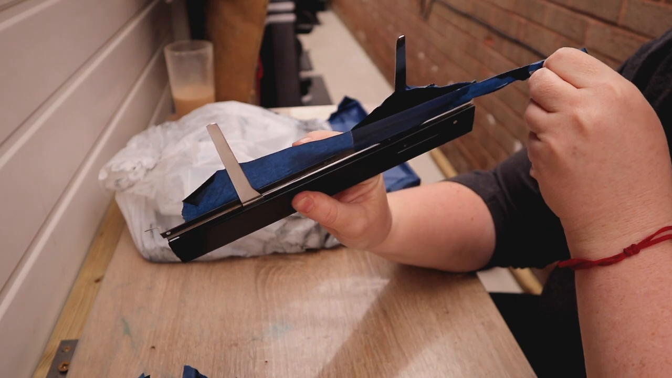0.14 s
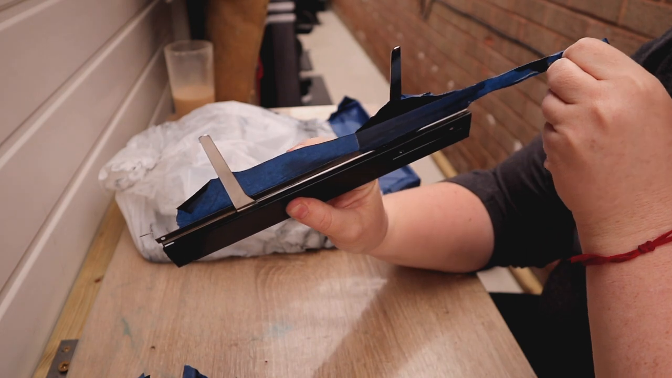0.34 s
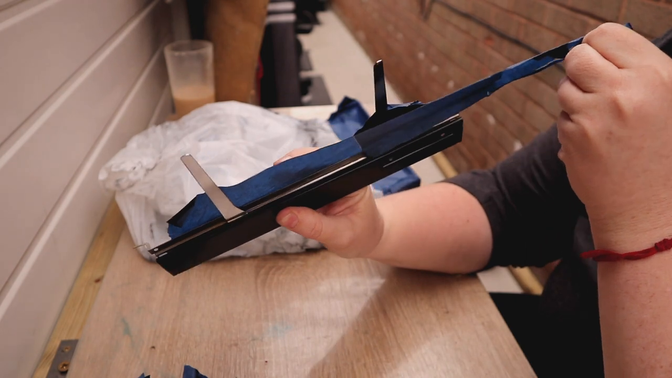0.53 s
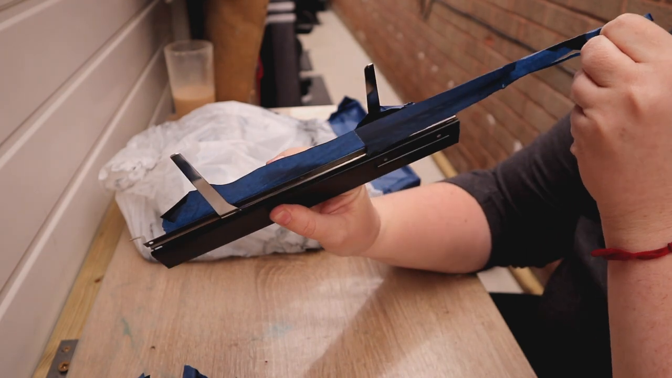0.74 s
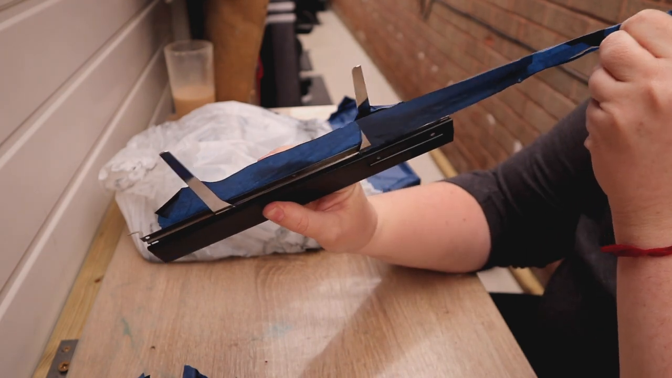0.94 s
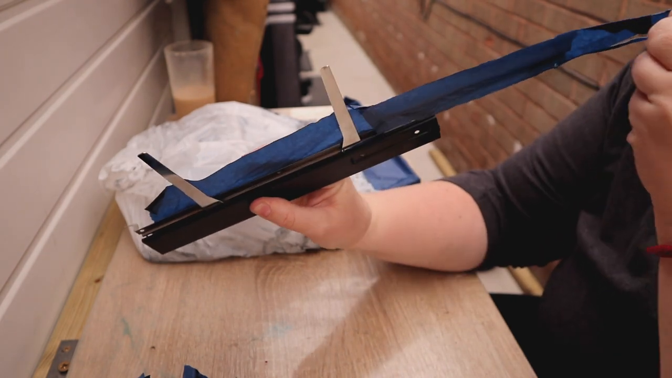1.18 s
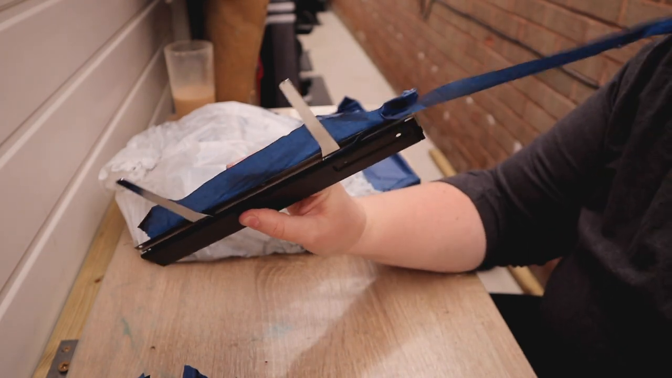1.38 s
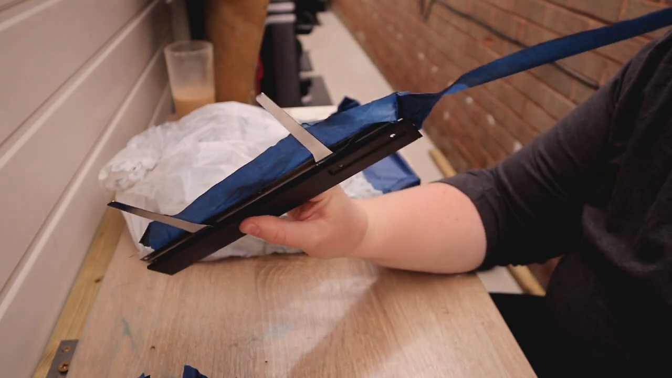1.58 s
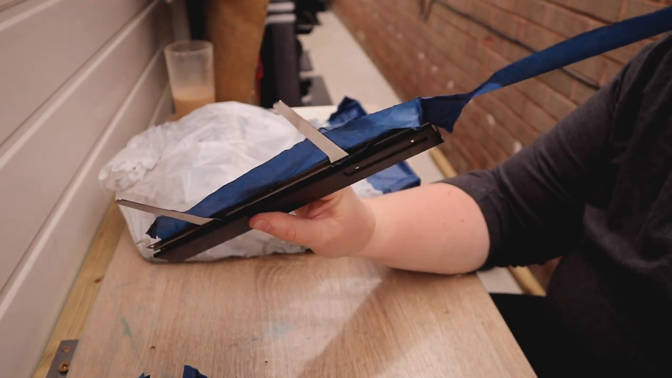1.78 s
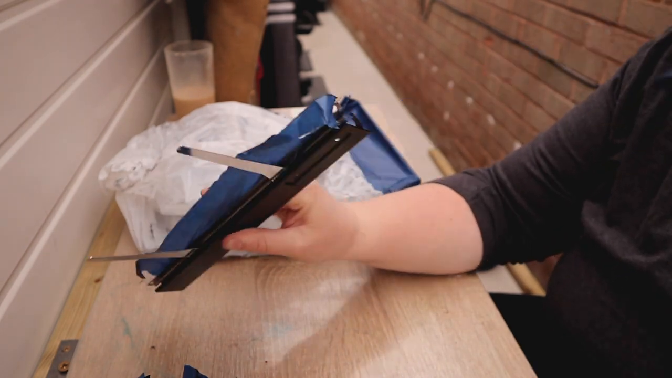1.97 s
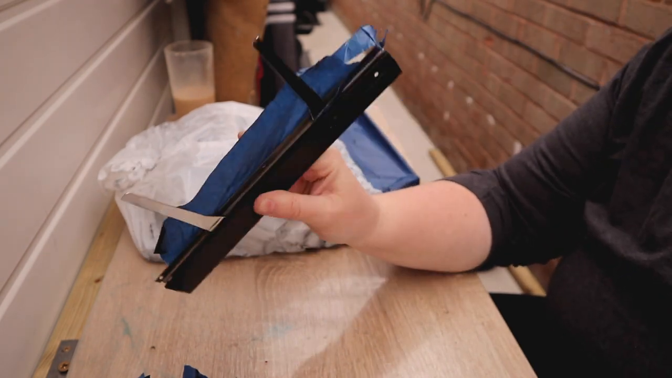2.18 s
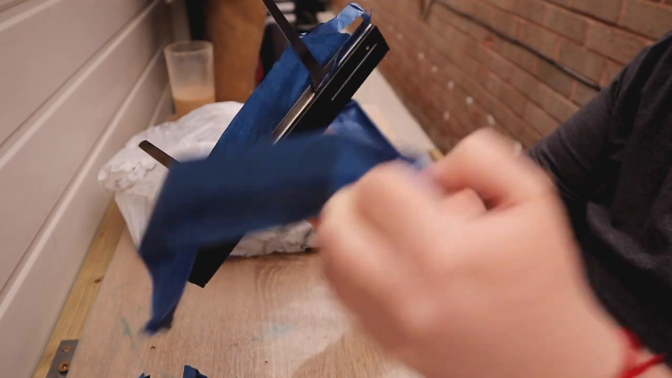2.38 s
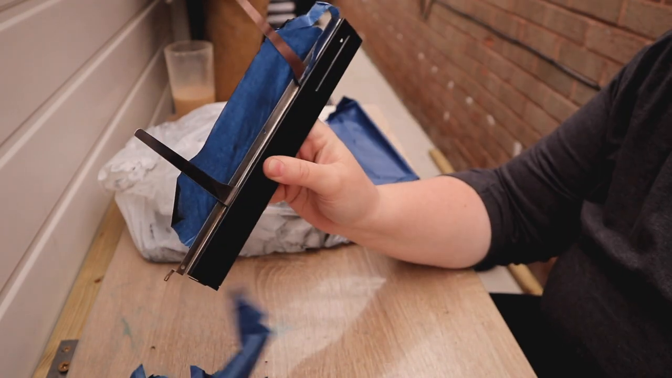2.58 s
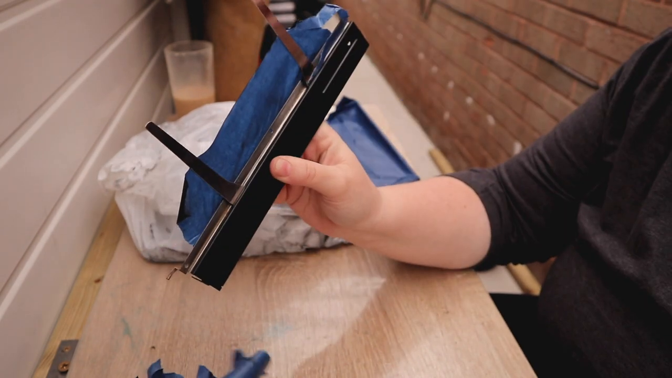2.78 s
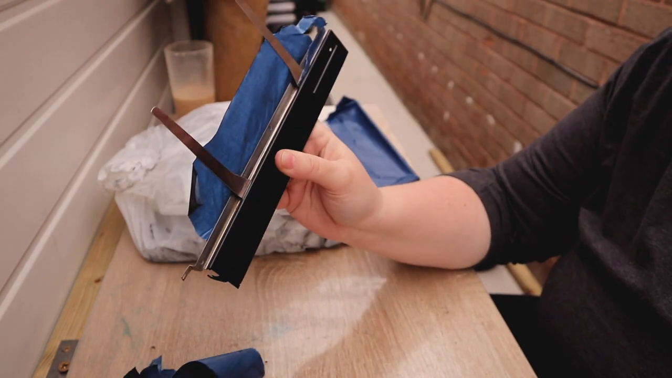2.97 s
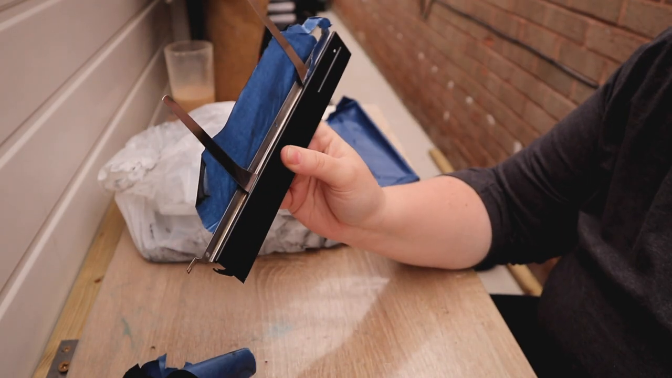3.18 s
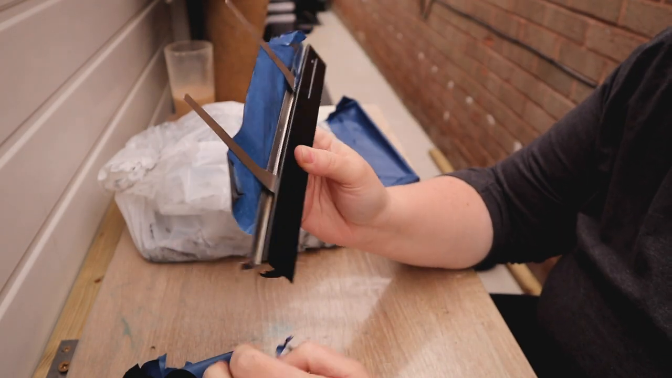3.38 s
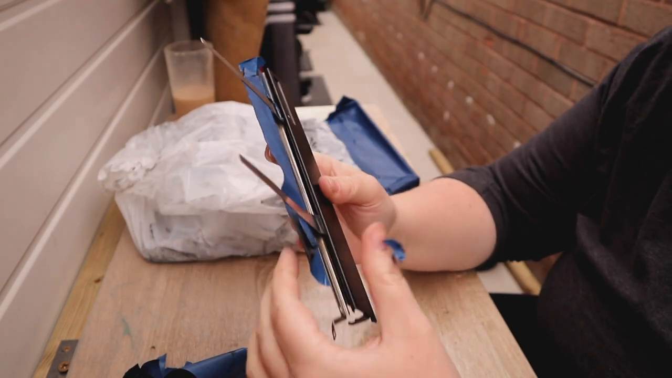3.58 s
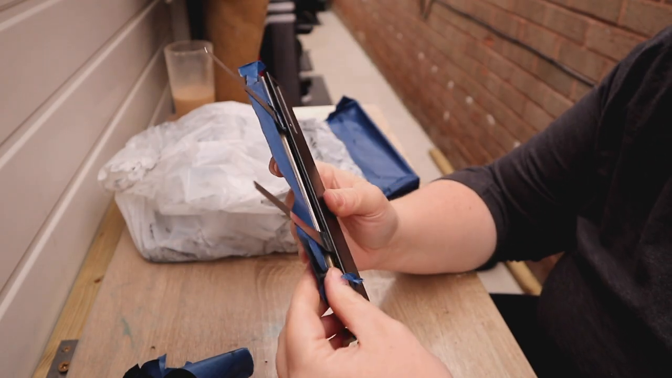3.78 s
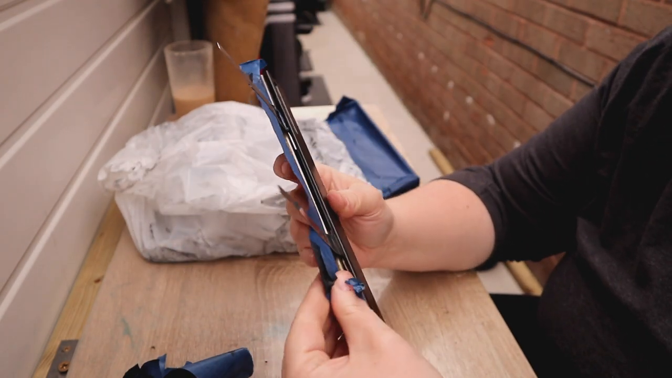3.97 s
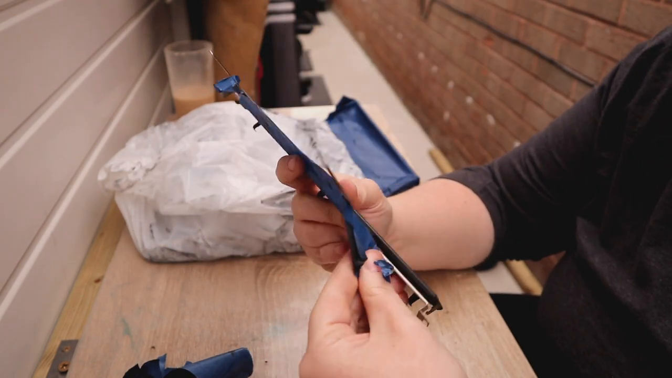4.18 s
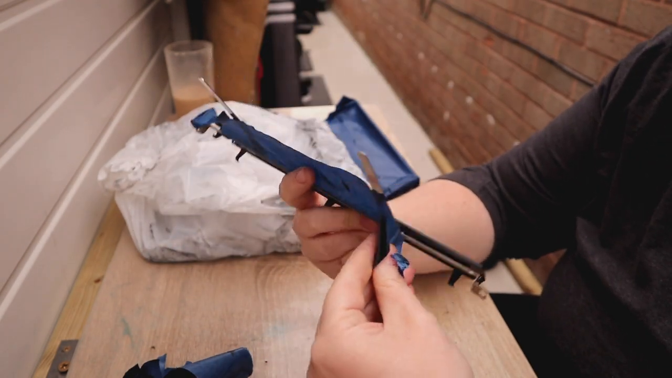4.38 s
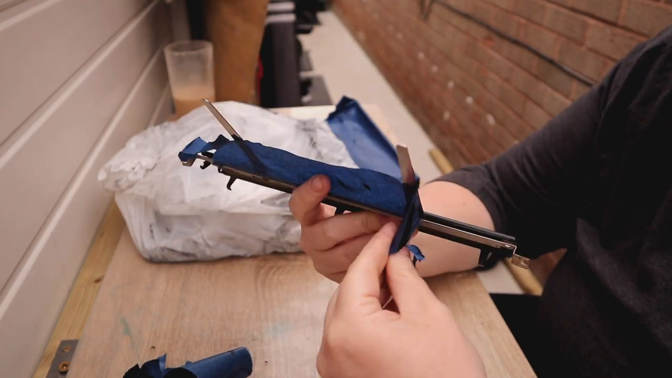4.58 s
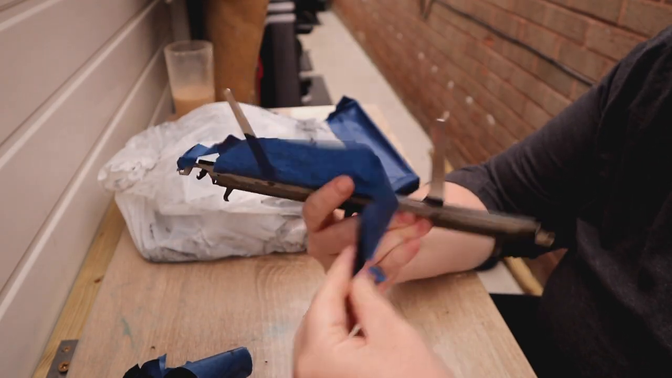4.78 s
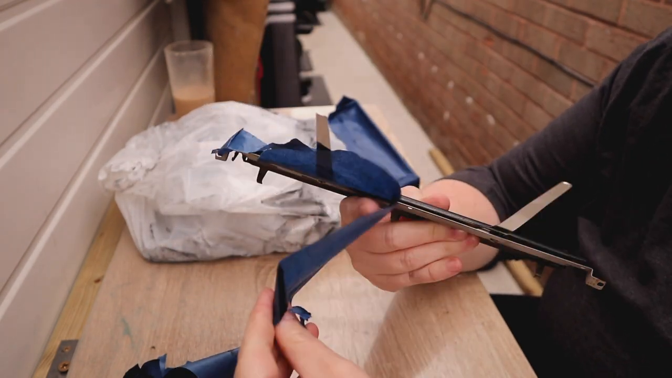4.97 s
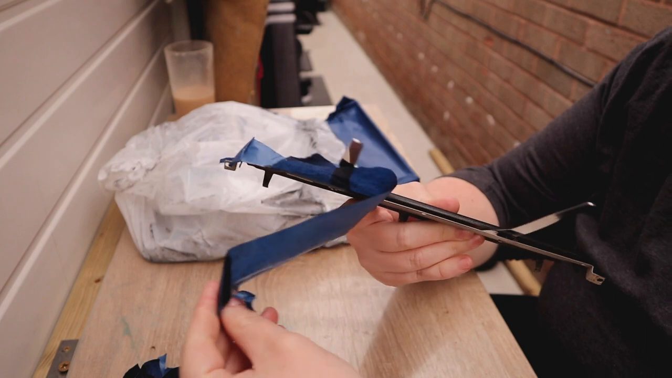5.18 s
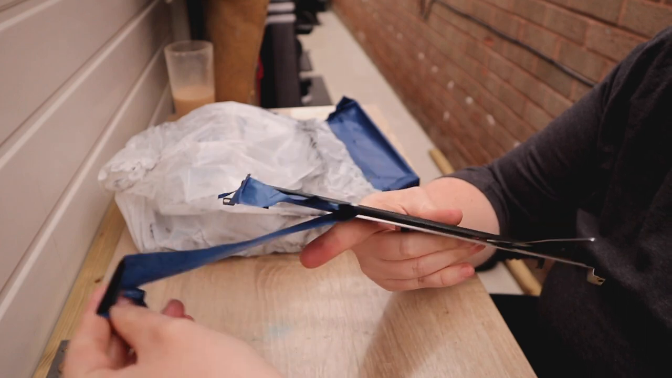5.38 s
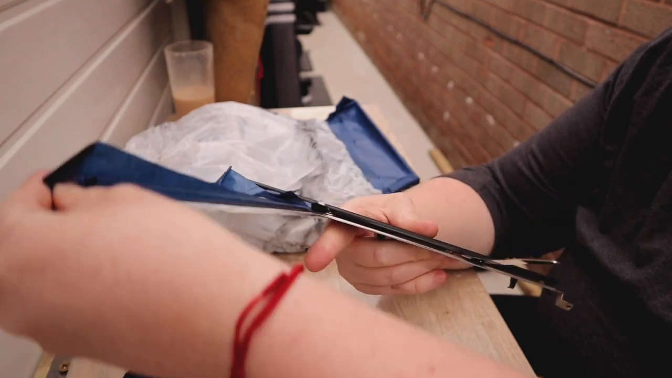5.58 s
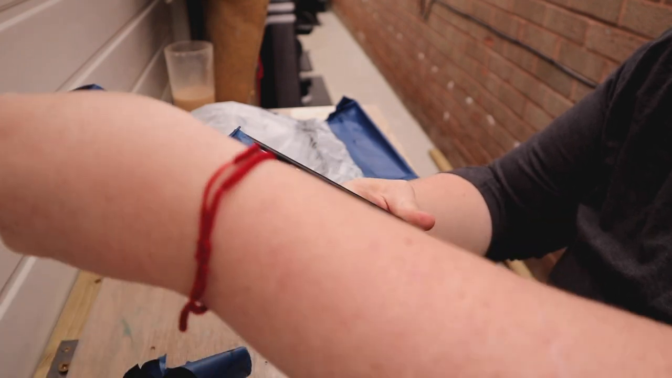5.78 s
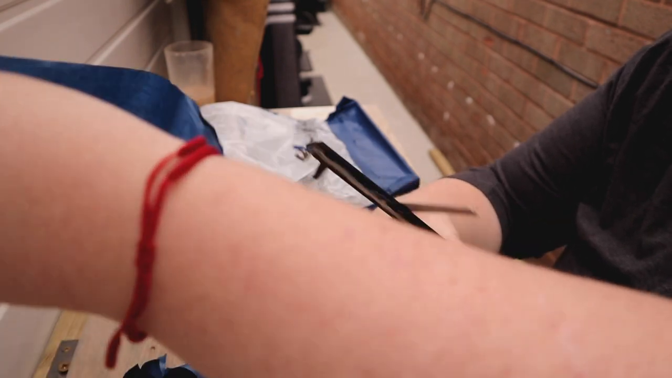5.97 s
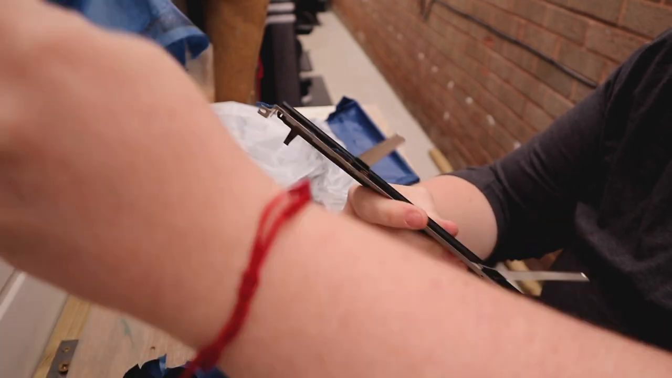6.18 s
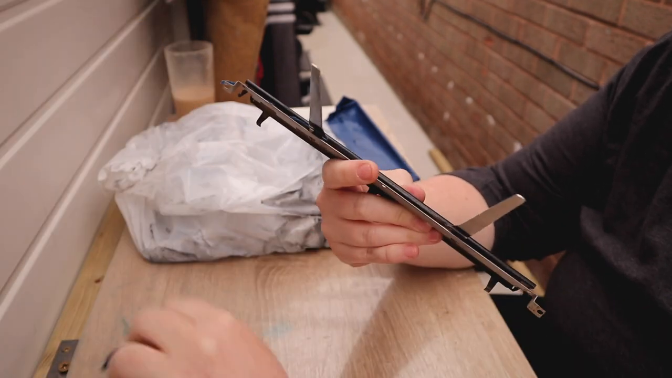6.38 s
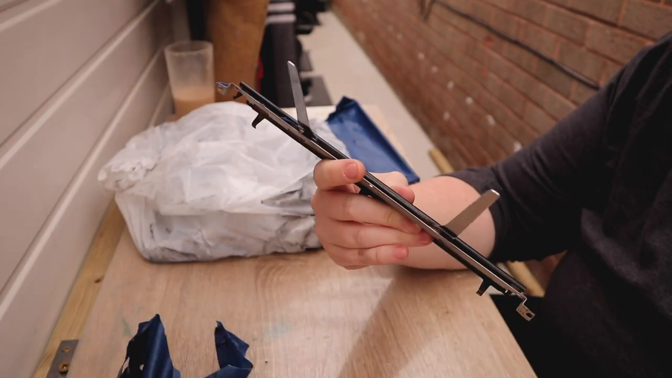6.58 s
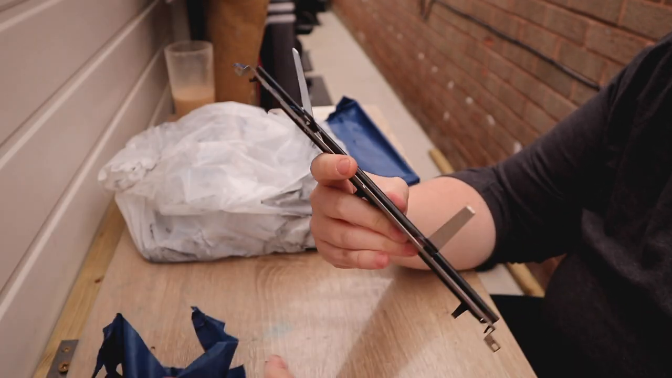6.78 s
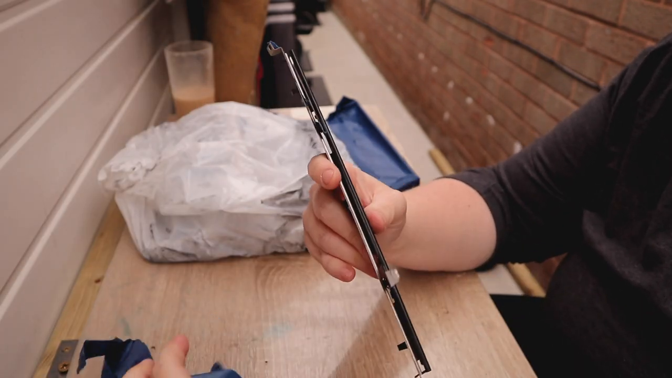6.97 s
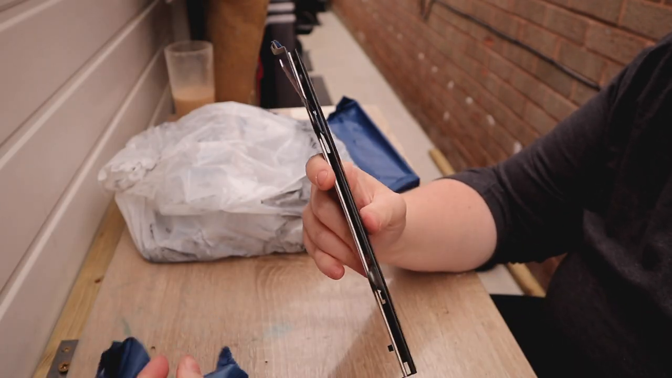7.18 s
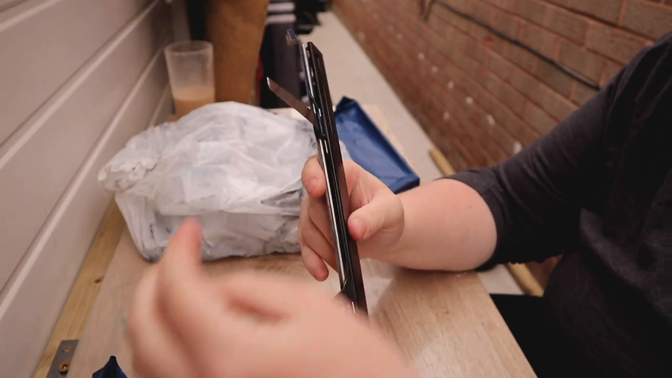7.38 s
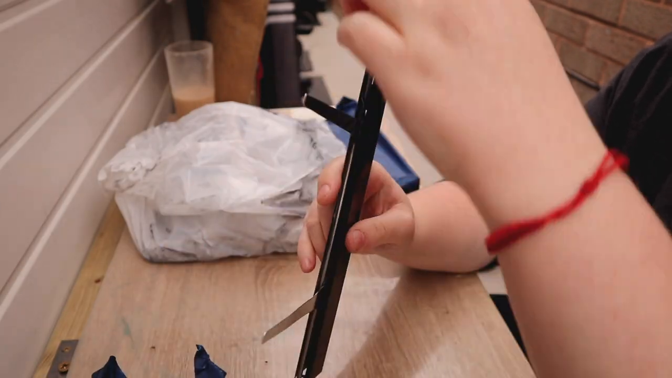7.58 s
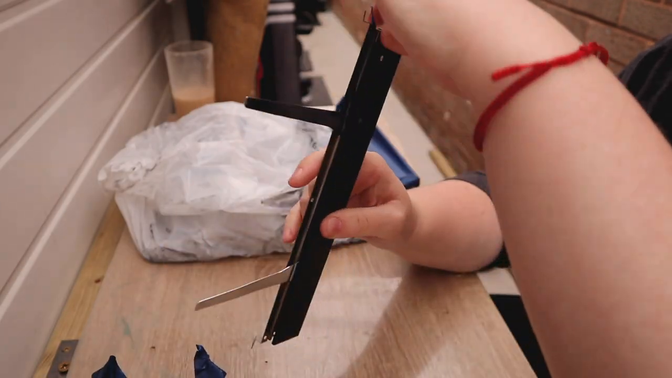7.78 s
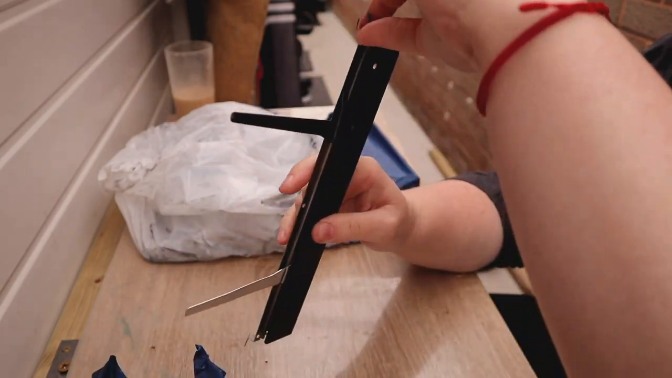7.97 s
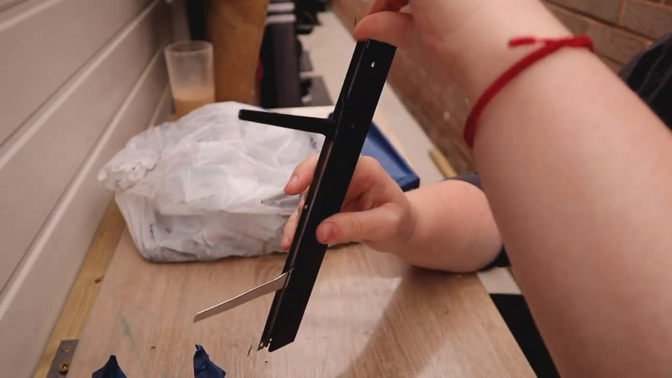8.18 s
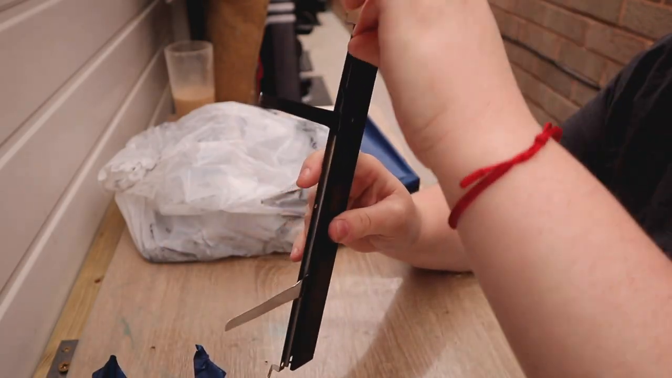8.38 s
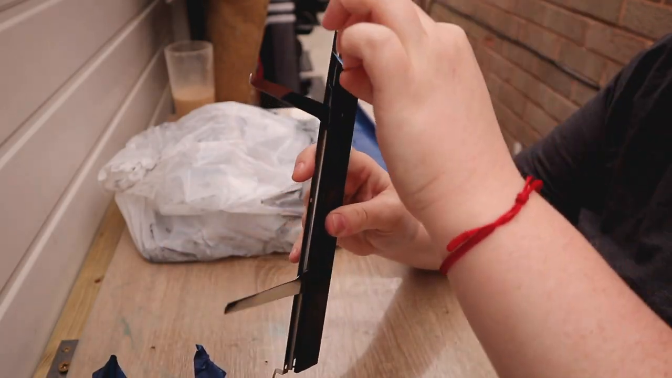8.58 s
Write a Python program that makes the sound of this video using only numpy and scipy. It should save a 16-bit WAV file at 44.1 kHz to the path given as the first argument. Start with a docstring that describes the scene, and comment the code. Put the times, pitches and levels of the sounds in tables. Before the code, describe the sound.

Masking tape is peeled slowly off a thin metal rail, then in quick ringing rips, with loose strips crinkling and snapping between pulls in a quiet small room.

```python
"""Masking tape is peeled off a thin metal rail held over a workbench in a small room, an engine droning far off.
It opens with a long slow pull: glue parts in tiny random snaps that hiss, then quick rips shake the rail and ring it.
Short pulls follow; between and among them loose strips rub, crumple and snap, and the rail thumps in the hand.
A spring clip, built from decaying sine modes, clinks once before the middle; late crumpling gives way to a
fingertip that slides on bare metal, a band of hiss with a narrow squeak. Arm swings stir the air as low noise."""
import sys
import numpy as np
from scipy import signal
from scipy.fft import rfft, irfft, next_fast_len
from scipy.io import wavfile
from scipy.ndimage import uniform_filter1d, map_coordinates

SR = 44100
rng = np.random.default_rng(int(sys.argv[2]) if len(sys.argv) > 2 else 0)


def wrap_up_sound(samples):
    """Save the sound to the file named by the first command line argument, as 16-bit audio."""
    columns = np.atleast_2d(samples).T
    # keep every value between -1 and 1, then stretch to whole-number steps
    tamed = np.clip(columns, -1, 1)
    steps = np.round(tamed * 32767).astype(np.int16)
    wavfile.write(sys.argv[1], SR, steps)


N = 381024
TIME = np.arange(N) / SR
BODY_HZ, HISS_HZ = 800, 4500  # edges between body, rasp and hiss

# Table levels are mixing levels, ahead of any later gain, resonance, reflection or room.
# Tone colour of loose, crinkled tape: pitch_hz [Hz], level_db [dB]
LOOSE_COLOUR = [(88, -42.5), (150, -9.5), (398, 0.5), (601, -6), (730, -2.5), (854, -7), (960, -4),
                (1260, -5), (1480, -4), (3220, -2.5), (6510, -9.5), (8730, -10), (10800, -17), (14000, -18),
                (16000, -26)]


def undb(db):
    """Decibels to gain."""
    return np.exp(np.asarray(db) * (np.log(10) / 20))


def unit(x):
    """Scale to rms 1."""
    return x / np.sqrt(np.mean(x ** 2) + 1e-20)


def add(out, x, start_s):
    """Mix x into out from a given time."""
    i = max(int(start_s * SR), 0)
    out[i:i + len(x)] += x[:N - i]


def colour(x, points):
    """Minimum-phase filter with a (Hz, dB) response, built by folding its cepstrum."""
    size = 4096
    hz, db = np.transpose(points)
    grid = np.log(np.fft.rfftfreq(size, 1 / SR) + 1)
    gain = undb(np.interp(grid, np.log(hz), db))
    cepstrum = irfft(np.log(gain))
    cepstrum[1:size // 2] *= 2
    cepstrum[size // 2 + 1:] = 0
    impulse = irfft(np.exp(rfft(cepstrum)))
    return signal.fftconvolve(x, impulse)[:len(x)]


def registers(x, low_hz, high_hz):
    """Low, middle and high part of a sound, each at rms 1."""
    hz = np.fft.rfftfreq(next_fast_len(len(x) + 512, True), 1 / SR)
    spectrum = rfft(x, 2 * (len(hz) - 1))
    low, high = (1 / (1 + np.sqrt(2) * 1j * hz / edge - (hz / edge) ** 2) ** 2 for edge in (low_hz, high_hz))
    above_low = low * (hz / low_hz) ** 4
    above_high = high * (hz / high_hz) ** 4
    return [unit(irfft(spectrum * gain)[:len(x)]) for gain in (low, above_low * high, above_high)]


def resonate(x, hz, width_hz):
    """One resonance, gain 1 at its centre."""
    hz = min(hz, .45 * SR)
    return signal.lfilter(*signal.iirpeak(hz, hz / width_hz, fs=SR), x)


def walk(rate):
    """Random wander, spread near 1, in straight lines between random points (rate per second)."""
    knots = np.arange(0, N / SR + 1, 1 / rate)
    return np.interp(TIME, knots, rng.standard_normal(len(knots)))


def envelope(start_s, length_s, rise_s, fall_s, swell_db=0):
    """Exponential attack, a hold from start_s that may swell, and exponential release."""
    t = TIME - start_s
    before = np.minimum(t, 0) / rise_s
    after = np.maximum(t - length_s, 0) / fall_s
    swell = undb(swell_db * np.clip(t / length_s, 0, 1))
    return np.exp(np.maximum(before - after, -20)) * swell


def crackle(per_s, spread_db, cap_db):
    """Random tiny fractures: most are small, a few are large."""
    most = 110000
    when, chance, side = rng.random((most, 3))[:int(per_s * N / SR)].T
    size = undb(np.minimum(-spread_db * np.log(1 - chance), cap_db))
    return unit(np.bincount((when * N).astype(int), size * np.sign(side - .5), N))


def facets(per_s, spread_db, cap_db, patchy_db, count=9):
    """Fractures in facets of many sizes: each size has its own pitch, and comes and goes on its own."""
    out = np.zeros(N)
    for hz in np.geomspace(600, 13500, count):
        ringing = resonate(crackle(per_s, spread_db, cap_db), hz, 0.34 * hz)
        out += ringing * undb(patchy_db * walk(rate=26))
    return unit(out)


def rustle(grains, table):
    """Play grains along a curve of body, rasp and hiss that fades at its ends."""
    s, *levels = np.transpose(table)
    inside = 1. * ((TIME >= s[0]) & (TIME <= s[-1]))
    active = uniform_filter1d(inside, size=800)
    parts = registers(grains, BODY_HZ, HISS_HZ)
    return active * sum(part * undb(np.interp(TIME, s, db)) for part, db in zip(parts, levels))


def burst(grains, start_s, length_s, rise_s, fall_s, body_db, hiss_db):
    """A short run of grains that swells, holds and dies away; returns the sound and its start."""
    span = slice(int((start_s - .06) * SR), int((start_s + length_s + .2) * SR))
    t = TIME[span] - start_s
    shape = np.exp(np.minimum(t, 0) / rise_s - np.maximum(t - length_s, 0) / fall_s)
    body, rasp, hiss = registers(grains[span] * shape, BODY_HZ, HISS_HZ)
    mix = undb(body_db) * body + rasp + undb(hiss_db) * hiss
    # restore the level of the shape, which the registers had evened out
    return mix * np.sqrt(np.mean(shape ** 2)), TIME[span][0]


def strip(x, start_s, length_s, hz, width_hz, boost_db, order=2):
    """A resonance of the strip colours its noise during one stroke; it sinks slowly and wavers with the hand's pull."""
    sag_per_s = 0.24  # share by which the resonance sinks as the freed strip lengthens
    span = slice(max(int((start_s - .1) * SR), 0), int((start_s + length_s + .1) * SR))
    out, part = x.copy(), x[span]
    sag = 1 - sag_per_s * (TIME[span] - start_s - length_s / 2)
    centre = hz * sag + 0.46 * width_hz * walk(rate=24)[span]
    # shift the moving centre to 0 Hz, low-pass there, and shift back
    turn = np.exp(2j * np.pi * np.cumsum(centre) / SR)
    lowpass = signal.butter(order, width_hz / 2, fs=SR)
    ring = 2 * np.real(turn * signal.filtfilt(*lowpass, part / turn, padlen=0))
    out[span] += (undb(boost_db) - 1) * signal.windows.tukey(len(part), .5) * ring
    return out


def room_air():
    """Steady noise with the room's own colour."""
    # Colour of the air: pitch_hz [Hz], level_db [dB]
    air_colour = [(12, -32), (20, -6.5), (63, -7), (81, -6), (172, -6), (228, -4.5), (277, -4),
                  (301, -13.5), (718, -22.5), (1030, -28.5), (1150, -16.5), (1530, -21.5), (16000, -28)]
    return undb(-64) * unit(colour(rng.standard_normal(N), air_colour))


def draughts():
    """Swinging arms stir the air: low noise around 24 Hz that swells with each swing."""
    # Arm swings: start_s [s], length_s [s], level_db [dB]
    swings = [(1.16, .07, -51.5), (2.124, .28, -55.5), (4.286, 0.078, -64), (4.953, 0.05, -47),
              (5.3, 0.066, -65.5), (6.11, 0.027, -61), (6.623, 0.36, -55.5), (7.47, .04, -65)]
    gusts = unit(resonate(resonate(rng.standard_normal(N), 23.7, 18), 23.4, 18))
    strength = undb(-68.5)  # still air
    for start_s, length_s, level_db in swings:
        strength = strength + undb(level_db) * envelope(start_s, length_s, rise_s=0.041, fall_s=0.1)
    return gusts * strength


def distant_engine():
    """A far engine: a sine at the wavering firing rate, and its octave."""
    # Course of the engine: time_s [s], firing_hz [Hz], octave_db [dB rms]
    engine_course = [(0, 57.3, -62), (1.7, 55.7, -64), (3.3, 54, -79.5), (4.6, 50.5, -78), (7, 58, -84),
                     (7.65, 65.4, -73), (8.64, 66, -72.5)]
    s, *columns = np.transpose(engine_course)
    hz, octave_db = (np.interp(TIME, s, c) for c in columns)
    phase = 2 * np.pi * np.cumsum(hz * (1 + 0.0097 * walk(rate=15))) / SR
    fundamental = undb(-71.5) * np.sin(phase)
    octave = undb(octave_db) * np.sin(2 * phase)
    return np.sqrt(2) * (fundamental + octave)  # from rms to peak


def sliding():
    """A fingertip drags over the bare rail: a thin hiss with a faint squeak in it."""
    # Slides: start_s [s], length_s [s], level_db [dB], squeak_hz [Hz], squeak_db [dB to level]
    slides = [(7.931, 0.057, -59, 7100, -8), (8.059, 0.065, -65, 8650, -9),
              (8.278, 0.056, -65.5, 8500, -10.5), (8.439, 0.02, -54.5, 3090, -5),
              (8.51, 0.17, -60.5, 6500, -11)]
    drag, out = crackle(per_s=6000, spread_db=2, cap_db=8), np.zeros(N)
    hiss = unit(resonate(drag, hz=6800, width_hz=7500))
    for start_s, length_s, level_db, squeak_hz, squeak_db in slides:
        squeak = unit(resonate(drag, squeak_hz, 0.016 * squeak_hz))
        stroke = undb(level_db) * envelope(start_s, length_s, rise_s=.008, fall_s=0.018)
        out += stroke * (undb(1.5) * hiss + undb(squeak_db) * squeak)
    return out


def clink(size=20000):
    """A spring clip scrapes against the rail and rings in decaying sine modes."""
    clip_modes = [(1545, -20, 0.24), (1820, -5, 0.26), (4210, 1.5, 0.061), (5850, -8, 0.12),
                  (6860, -22, .2), (12700, -11, .07)]
    out, t = np.zeros(N), TIME[:size]
    # a finger damps most of the ring at once
    damping = undb(-9.5) + np.exp(-t / 0.0087)
    ring = damping * sum(undb(db) * np.sin(2 * np.pi * hz * t) * undb(-60 * t / t60_s) for hz, db, t60_s in clip_modes)
    scrape = unit(colour(rng.standard_normal(size), LOOSE_COLOUR) * np.exp(-t / 0.0049))
    attack = 1 - np.exp(-t / 0.0011)
    add(out, (undb(-36) * ring + undb(-59.5) * scrape) * attack, start_s=3.562)
    return out


def jolting(size=12000):
    """The rail jolts in the hand as the tape gives: noise pushes through a low resonance, as dull thumps."""
    # Jolts: start_s [s], pitch_hz [Hz], level_db [dB]
    jolts = [(1.049, 152, -44), (1.056, 55, -48), (1.425, 60, -56), (1.98, 60, -73), (2.189, 59, -52),
             (4.845, 56, -52.5), (5.917, 60, -68)]
    out, t = np.zeros(N), TIME[:size]
    for (start_s, hz, level_db), noise in zip(jolts, rng.standard_normal((len(jolts), size))):
        push = noise * np.exp(-t / 0.0096)
        thump = unit(resonate(resonate(push, hz, 27.5), hz, 27.3))
        add(out, undb(level_db - 8) * thump, start_s)
    return out


def crinkling():
    """Loose paper tape rubs on itself and buckles in clusters of small creases."""
    # Loose tape shuffled in the hand: start_s [s], length_s [s], level_db [dB], hiss_db [dB to rasp]
    rubs = [(1.68, 0.13, -86, 20), (2.21, 0.0046, -75.5, 14.5), (2.295, .14, -67, 12),
            (2.561, 0.11, -51.5, 5.5), (2.71, 0.17, -57.5, 5.5), (2.976, 0.13, -55, 10.5),
            (6.0, 0.09, -67, 5), (6.229, 0.091, -58, 11.5), (6.4, 0.13, -58.5, 10.5),
            (6.515, 0.25, -50, 4.5), (6.816, 0.22, -58.5, 9), (7.106, 0.017, -56, 3.5)]
    # Folds that collapse: start_s [s], length_s [s], level_db [dB], body_db, hiss_db [dB to rasp]
    crumples = [(2.069, 0.039, -48.5, -6, -8), (2.567, 0.0024, -41.5, -16, 1), (2.6, .002, -53.5, 4, 17),
                (2.619, .005, -45, -6, 9), (2.808, 0.0064, -54.5, -18, 8.5), (2.928, .012, -53, -10, 4.5),
                (3.028, 0.015, -61, -20, 6), (3.73, 0.042, -63, -9, 2.5), (6.134, 0.023, -58.5, -10, 16.5),
                (6.299, 0.0047, -46.5, 2.5, -9), (6.357, 0.0047, -48.5, -3, -20),
                (6.476, 0.015, -44, 0.5, 8), (6.505, 0.058, -39, -13, -7), (6.729, 0.0041, -45, -9, -3),
                (6.866, 0.0095, -47, -27, 3.5), (7.333, 0.016, -55, 1, 9), (7.36, 0.031, -59, -10, 3)]
    # Faint rustle of the grip throughout: body_db, rasp_db, hiss_db [dB]
    grip_db = (-69, -77, -79.5)
    buckles = facets(per_s=420, spread_db=2, cap_db=22, patchy_db=2.0)
    rubbing = crackle(per_s=3300, spread_db=4.5, cap_db=11.5)
    lone_creases = facets(per_s=22, spread_db=2, cap_db=15.5, patchy_db=2.5)
    mix = buckles + undb(-0.5) * rubbing + undb(-7) * lone_creases
    creases = colour(mix * undb(3.8 * walk(rate=63)), LOOSE_COLOUR)
    body, rasp, hiss = parts = registers(creases, BODY_HZ, HISS_HZ)
    out = sum(undb(db) * part for db, part in zip(grip_db, parts))
    flutter = undb(1.5 * walk(rate=30))  # unevenness of a shuffle
    for start_s, length_s, level_db, hiss_db in rubs:
        shuffle = undb(-12) * body + rasp + undb(hiss_db) * hiss
        out += undb(level_db) * flutter * envelope(start_s, length_s, rise_s=0.027, fall_s=0.033) * shuffle
    for start_s, length_s, level_db, body_db, hiss_db in crumples:
        sound, sound_s = burst(creases, start_s, length_s, 0.0022, .006, body_db, hiss_db)
        add(out, undb(level_db) * sound, sound_s)
    return out


def snapping(size=2048):
    """A crease flips: a sharp crack, a few cycles of its facet, then a brief shiver of the strip."""
    # Snaps: start_s [s], level_db [dB], pitch_hz [Hz], body_db, top_db [dB to the middle register]
    snaps = [(.4884, -20.5, 6460, -36, 1.5), (1.1618, -24, 8950, -36, -4), (1.2039, -27.5, 8420, -24, -6),
             (1.3042, -28, 5640, -28, 6.5), (1.4638, -12, 5700, -22, -8), (1.5322, -24, 5750, -13, -14),
             (1.5468, -17, 8200, -17, -23), (1.5604, -15, 7840, -29, -12), (1.6056, -16.5, 8000, -38, 5),
             (1.8106, -37, 7260, -27, 9), (1.981, -7, 8400, -24.5, -21), (2.5411, -23, 3060, -21, -12),
             (2.5489, -17.5, 3880, -24, -22), (2.837, -14.5, 3230, -20.5, -7.5),
             (2.8639, -23, 3200, -41, -23), (3.0374, -25, 5130, -42, 3), (3.0579, -21, 3670, -40, -16),
             (3.0988, -12.5, 3800, -25, -2), (3.1087, -15, 6900, -32, -3), (3.1258, -19, 4040, -16, -26),
             (3.2364, -33, 3800, -21, -7), (3.291, -38, 5500, -28, -12), (3.8112, -37, 5780, -13, -19),
             (4.1568, -38, 3500, -35, 13), (5.6271, -29, 4530, -10, -1.5), (6.1949, -34, 6270, -6, -10),
             (6.4266, -18, 4040, -19.5, -30), (6.5092, -12.5, 3350, -12.5, -18),
             (6.546, -11.5, 6460, -37, -30), (6.6312, -13.5, 3080, -23, -30),
             (6.7235, -13.5, 5900, -28, -8), (6.7363, -12.5, 8300, -22, -13), (6.8627, -16, 8800, -26, -15),
             (6.9825, -20.5, 4170, -27, -8), (7.2439, -30, 4200, -23, -18), (7.331, -13, 4540, -21.5, -14),
             (7.354, -6, 5700, -47, -14.5), (7.4859, -28, 3070, -44, 2.5), (7.5469, -24.5, 6440, -17.5, -6),
             (7.8349, -27, 5600, -41, -12)]
    out, lead_s = np.zeros(N), .001  # short lead before the crack's peak
    t = TIME[:size] - lead_s
    onset = np.exp(np.minimum(t, 0) / 0.00067)
    for (start_s, level_db, hz, body_db, top_db), noise in zip(snaps, rng.standard_normal((len(snaps), size))):
        crack = noise * onset * np.exp(-np.abs(t) / 0.0014)
        shiver = noise * onset * np.exp(-np.abs(t) / 0.0071)
        sound = resonate(crack, hz, .4 * hz)  # the facet
        sound = sound + undb(-14.0) * resonate(crack, 3370, 1000) + undb(-31.5) * crack
        sound = sound + undb(-23.0) * resonate(shiver, 3600, 5400)
        body, middle, top = registers(sound, BODY_HZ, high_hz=8000)
        balanced = undb(body_db + 8.5) * body + middle + undb(top_db) * top
        add(out, undb(level_db - 27) * balanced, start_s)
    return out


def ripping():
    """Fast pulls: the peel line sticks and slips, and shakes the rail into its resonances."""
    # The tape runs free: start_s [s], length_s [s], rise_s [s], fall_s [s], level_db [dB],
    # body_db, hiss_db [dB to rasp], ring_db [dB, drive of the rail to level]
    rips = [(1.029, 0.0059, 0.0051, 0.01, -31, -3.5, -11, -21),
            (1.06, .0041, 0.0022, 0.0051, -18.5, -8.5, 0, -30),
            (1.418, 0.038, 0.0078, 0.019, -31, -10, 0.5, -26),
            (1.534, 0.098, .001, 0.012, -42, -6, 7.5, -18),
            (1.981, 0.014, 0.0033, 0.0046, -30, -3, 8, -13.5),
            (4.183, 0.0059, .0049, 0.003, -36, -10.5, 6.5, -20),
            (4.845, 0.0017, 0.0013, 0.0055, -23, -6, 0, -10),
            (4.859, 0.051, 0.0084, 0.022, -22, -13.5, 1, -17.5),
            (5.414, 0.0054, 0.0019, 0.0043, -24, -4, 0.5, -17),
            (5.916, 0.003, .0018, 0.0017, -23, -3.5, -4, -12),
            (5.926, 0.024, .0097, 0.0086, -23.5, -13, -2.5, -12),
            (5.972, .0084, .002, 0.0074, -40, -4, 9, -6.5)]
    # Resonances of the rail: pitch_hz [Hz], width_hz [Hz], level_db [dB]
    rail_modes = [(350, 29, -12), (1090, 48, -21), (1178, 22, 0), (1712, 27, 1.5), (2470, 42, -6),
                  (3180, 54, -2), (3230, 110, -4), (3805, 14, 2), (4140, 170, 2), (4570, 25, 6),
                  (5420, 54, 10.5), (5870, 56, -4), (5920, 100, 4), (5700, 45, 1), (6300, 71, 7.5),
                  (11800, 110, -13)]
    # Colour of fast-running tape: pitch_hz [Hz], level_db [dB]
    running_colour = [(59, -43), (100, -20.5), (328, -10), (662, -15.5), (1100, -4.5), (1390, -8),
                      (2750, -5.5), (3250, -6.5), (4980, -3.5), (5770, 0), (6840, 0), (8830, 6),
                      (10700, -3), (13800, 0), (16000, -14)]
    fractures = crackle(per_s=9000, spread_db=7.5, cap_db=16.0)
    slips = colour(fractures * undb(2 * walk(rate=670)), running_colour)
    tape, force = np.zeros(N), np.zeros(N)
    for start_s, length_s, rise_s, fall_s, level_db, body_db, hiss_db, ring_db in rips:
        sound, sound_s = burst(slips, start_s, length_s, rise_s, fall_s, body_db, hiss_db)
        add(tape, undb(level_db) * sound, sound_s)
        add(force, undb(level_db + ring_db) * sound, sound_s)
    rail = sum(undb(db) * resonate(force, hz, width_hz) for hz, width_hz, db in rail_modes)
    return undb(-5.5) * tape + undb(8.5) * rail


def peeling():
    """Glue threads part one by one, unevenly, as the tape is drawn slowly; the crepe backing creaks along."""
    # The long first pull: time_s [s], body_db, rasp_db, hiss_db [dB]
    first_pull = [(0, -55.5, -58, -53), (.42, -53.5, -55.5, -48.5), (.55, -48.5, -52, -43.5),
                  (.66, -59.5, -57, -51.5), (.89, -60.5, -58.5, -52.5), (.99, -54, -53, -46.5),
                  (1.02, -39.5, -45, -40.5), (1.15, -69, -58.5, -54.5), (1.27, -70, -70, -54)]
    # Short pulls: start_s [s], length_s [s], level_db [dB], swell_db [dB over the hold],
    # body_db, hiss_db [dB to rasp], low_hz [Hz, strip resonance], low_boost_db [dB], high_hz [Hz, strip resonance]
    pulls = [(1.314, 0.12, -49.5, 3, -5, 7.5, 3160, 0.5, 5770),
             (1.947, 0.012, -67, 9.5, -4, 18.5, 3170, -2, 5600),
             (4.192, 0.068, -56, -4, -9, 12, 2430, 4.5, 6340),
             (4.386, 0.081, -51.5, -2, -8.5, 8.5, 3070, 11.5, 6400),
             (4.535, 0.4, -61.5, 13.5, -10.5, 5.5, 3000, 2.5, 6550),
             (5.043, 0.0037, -59.5, 7.5, -9, 5, 2370, 1, 5850),
             (5.212, 0.2, -46, 0.5, -7, 5.5, 2270, 8, 5870),
             (5.485, 0.23, -60.5, -7.5, -5, 6.5, 2320, -2.5, 7600),
             (5.783, 0.18, -61.5, 10.5, -0.5, 5, 2450, 0.5, 6300)]
    # Colours of taut tape, and of tape close by: pitch_hz [Hz], level_db [dB]
    taut_colour = [(88, -21), (150, -3.5), (328, 1), (448, -3), (534, -11.5), (1100, -11.5), (1500, -9),
                   (1790, -5.5), (2140, -14.5), (2600, -5.5), (4320, -12), (8400, -12), (10400, -16.5),
                   (13400, -16.5), (16000, -24)]
    close_colour = [(88, -45), (150, -11), (270, -14), (406, -7), (689, -15.5), (1140, -11), (1420, -16.5),
                    (1530, -6.5), (2360, -10.5), (4760, -8.5), (7320, -3.5), (13200, -11), (16000, -16)]
    glue = crackle(per_s=7000, spread_db=3.0, cap_db=16)
    crepe = facets(per_s=2500, spread_db=2.5, cap_db=15.5, patchy_db=3)
    threads = unit(glue + undb(-0.5) * crepe) * undb(1.77 * walk(rate=120))
    taut = colour(threads, taut_colour)
    out = strip(rustle(taut, first_pull), 0.804, 0.14, hz=1130, width_hz=260, boost_db=7.5)
    # once the rail is turned round, the tape peels closer to the microphone
    turn_s = 3.5
    far, near = (registers(x, BODY_HZ, HISS_HZ) for x in (taut, colour(threads, close_colour)))
    for start_s, length_s, level_db, swell_db, body_db, hiss_db, low_hz, low_boost_db, high_hz in pulls:
        body, rasp, hiss = far if start_s < turn_s else near
        pull = undb(body_db) * body + rasp + undb(hiss_db) * hiss
        pull = pull * envelope(start_s, length_s, 0.037, 0.02, swell_db)
        pull = strip(pull, start_s, length_s, low_hz, width_hz=770, boost_db=low_boost_db)
        out += undb(level_db) * strip(pull, start_s, length_s, high_hz, width_hz=210, boost_db=5.5)
    return out


def glance(x):
    """The rail's flat face mirrors the tape's noise; as the hands move, the comb-like colour shifts."""
    lag_s = 0.000853 * (1 + 0.11 * walk(rate=7))
    level = undb(-11.5)
    mirrored = map_coordinates(x, [(TIME - lag_s) * SR], order=3)
    return (x + level * mirrored) / np.hypot(1, level)


def room(x, t60_s=0.3, early_s=0.013, early_db=-12, late_db=-15, size=18000):
    """Quick reflections from bench and wall, then a short, duller tail."""
    t = TIME[:size]
    sparse = (rng.random(size) < .06) * (t > .002)
    early = rng.standard_normal(size) * sparse * np.exp(-t / early_s)
    late = rng.standard_normal(size) * (1 - np.exp(-t / 0.0029)) * undb(-60 * t / t60_s)
    late = colour(late, [(200, 2), (3000, -3.0), (7000, -5.0), (15000, -9.5)])
    response = (undb(early_db) * unit(early) + undb(late_db) * unit(late)) / np.sqrt(size)
    return x + signal.fftconvolve(x, response)[:N]


def scene():
    """All the handwork in the room, over its background."""
    background = room_air() + draughts() + distant_engine()
    mirrored = glance(sliding() + crinkling() + peeling())
    handwork = mirrored + clink() + jolting() + snapping() + ripping()
    return (room(handwork) + background)[None]


def record(dry):
    """The microphone has a dip in the high treble; the recorder cuts the top."""
    voiced = dry - 0.41 * resonate(dry, hz=10660, width_hz=2200)
    top_cut = signal.ellip(10, .2, 70, 15900, fs=SR, output="sos")  # low-pass at 15.9 kHz
    return signal.sosfilt(top_cut, voiced)


dry = scene()
out = record(dry)
wrap_up_sound(out)
```